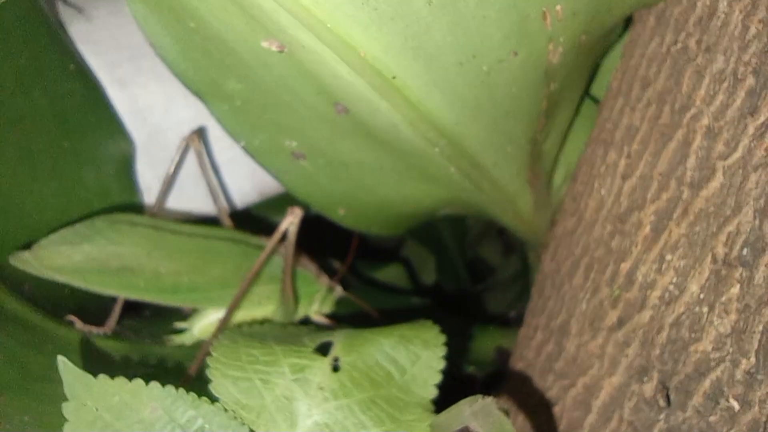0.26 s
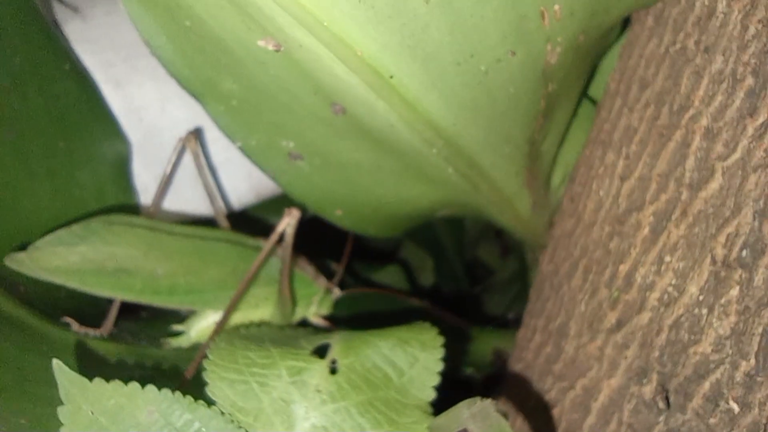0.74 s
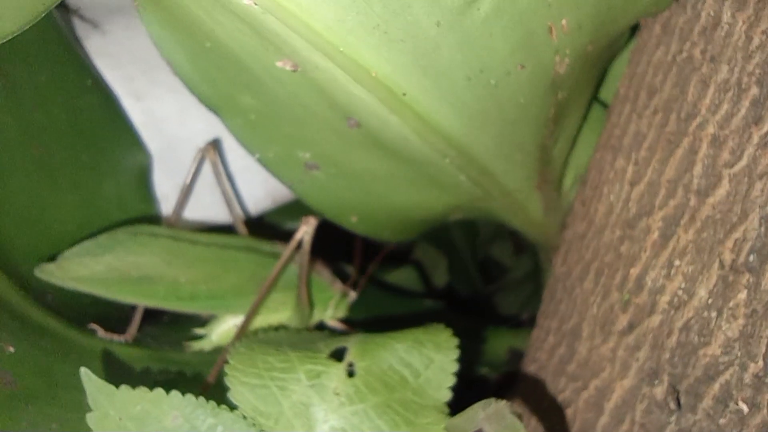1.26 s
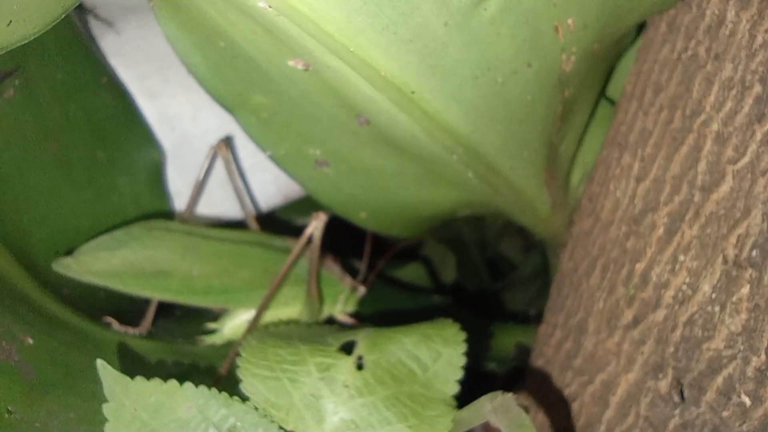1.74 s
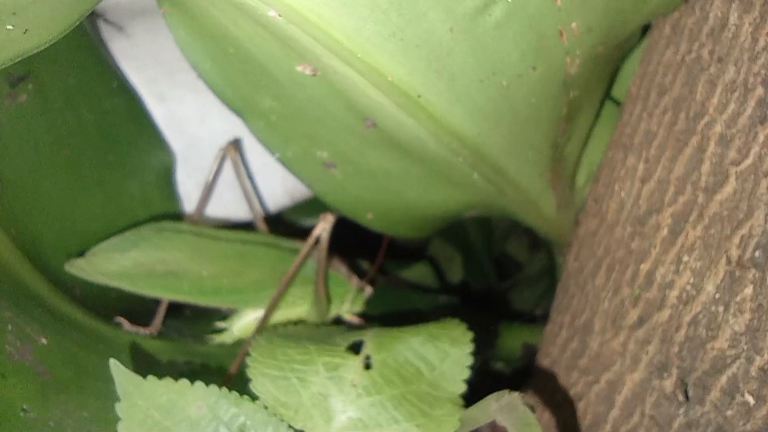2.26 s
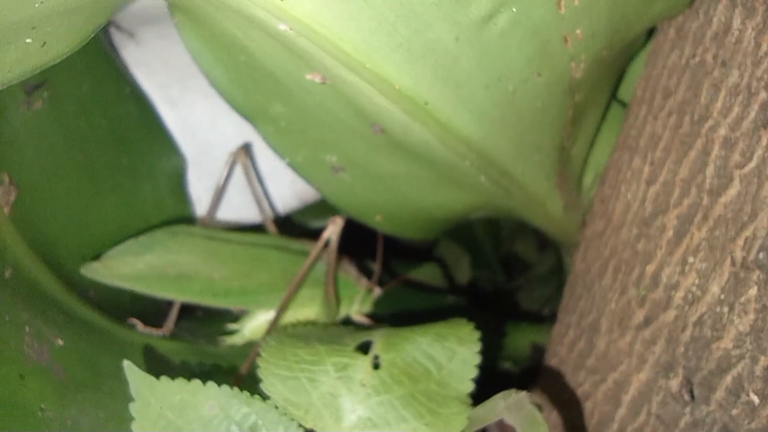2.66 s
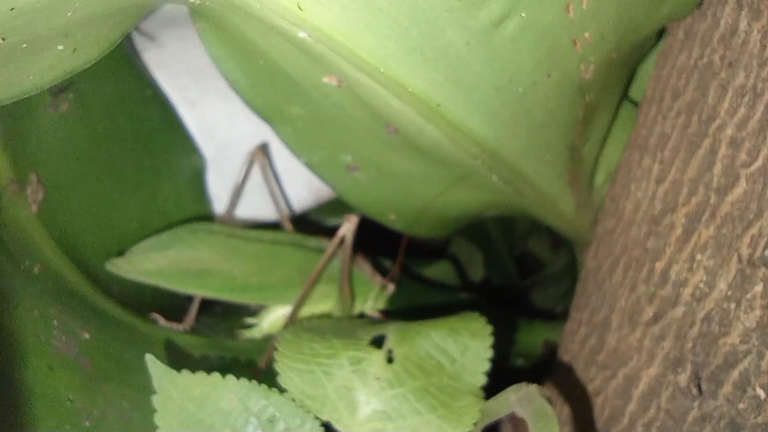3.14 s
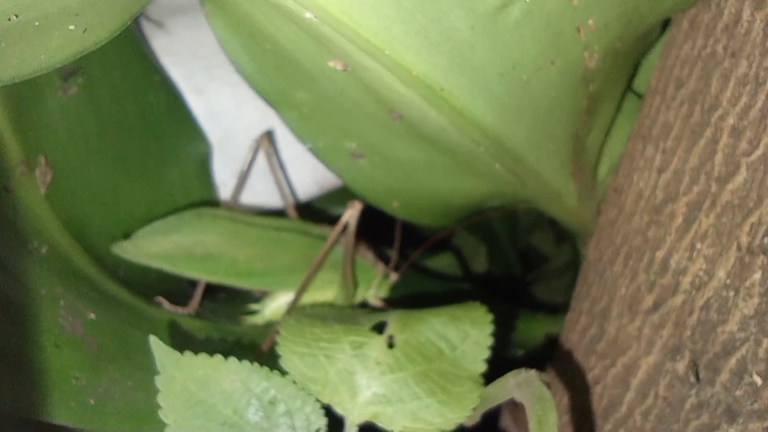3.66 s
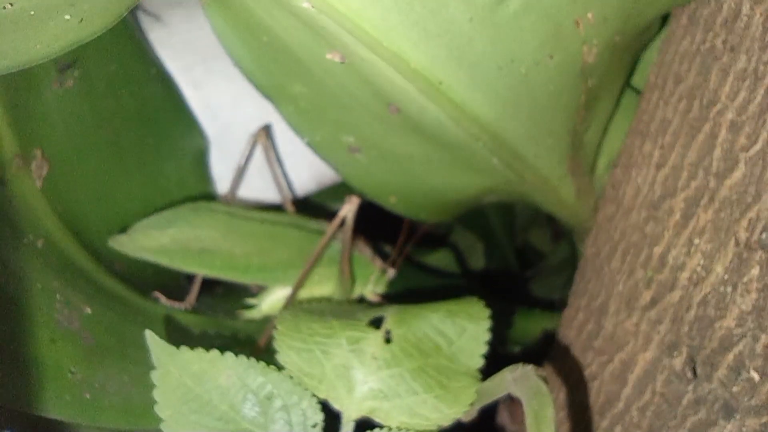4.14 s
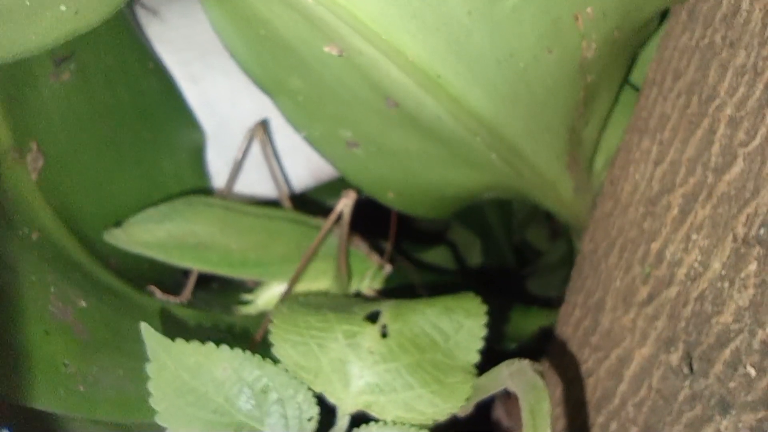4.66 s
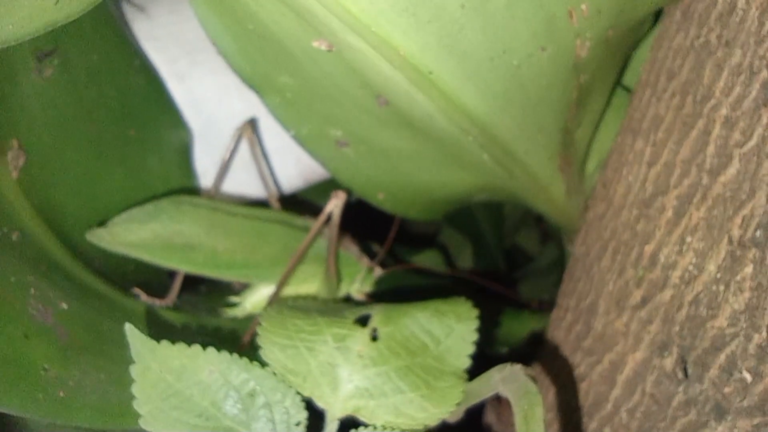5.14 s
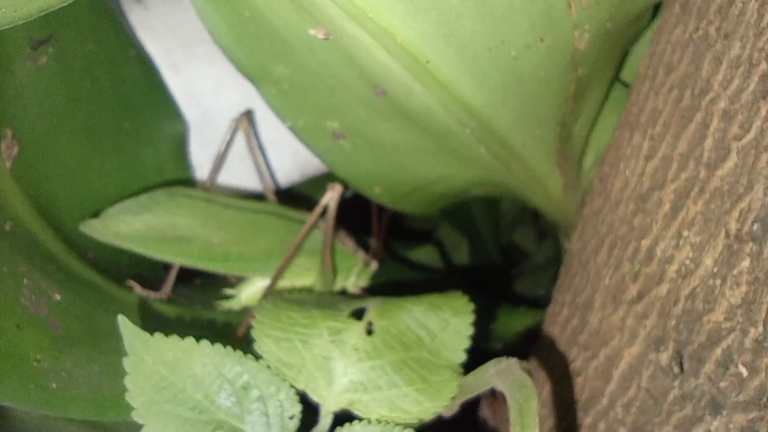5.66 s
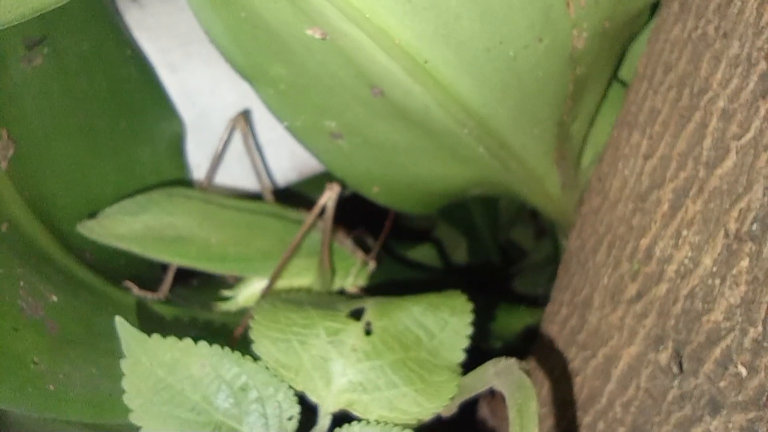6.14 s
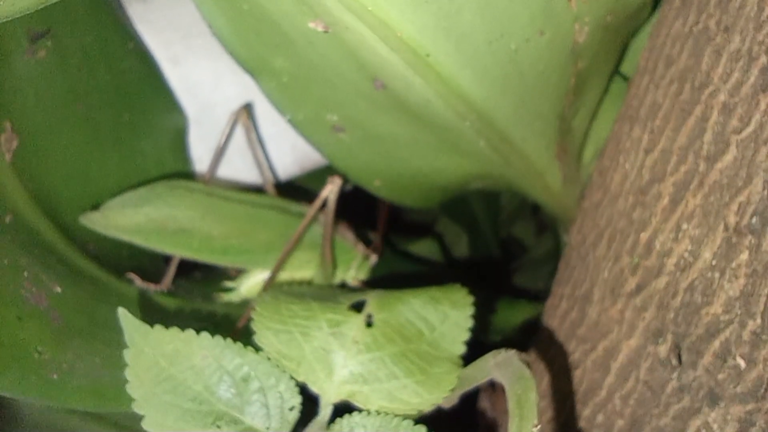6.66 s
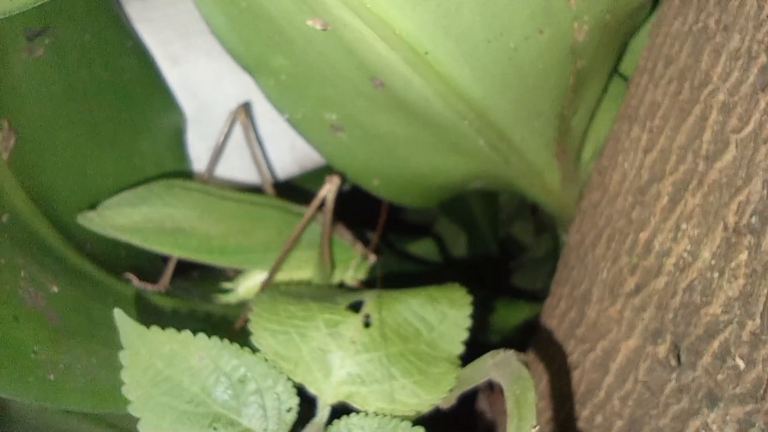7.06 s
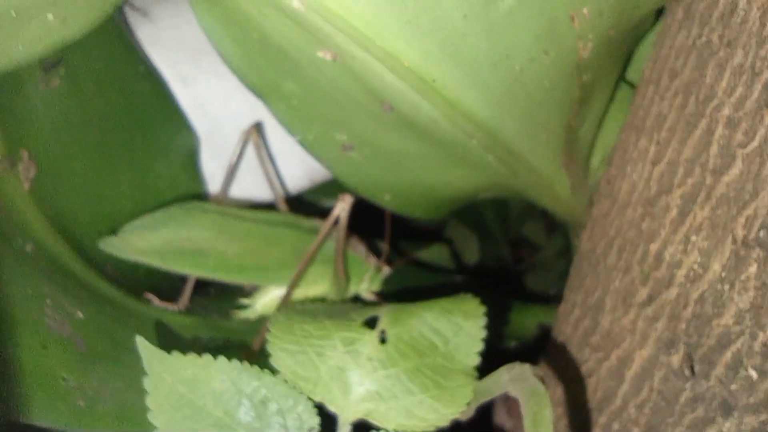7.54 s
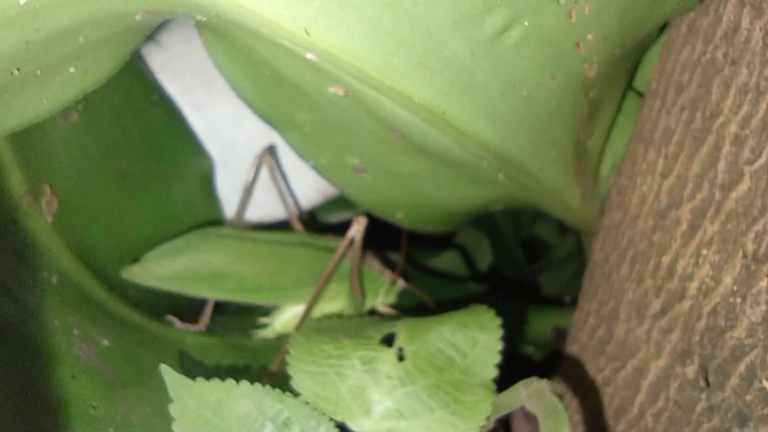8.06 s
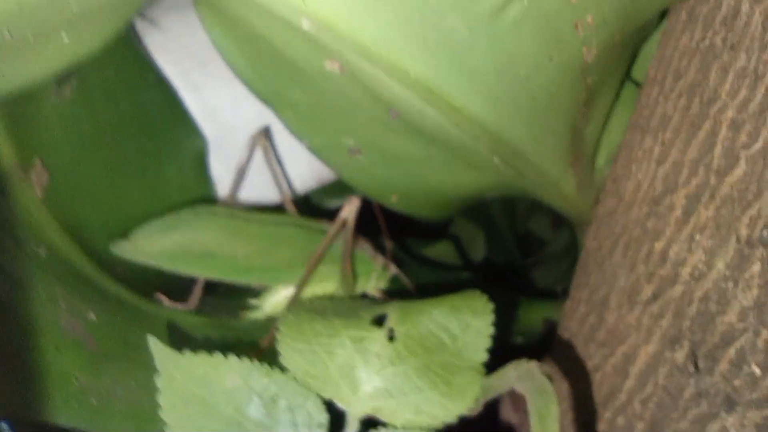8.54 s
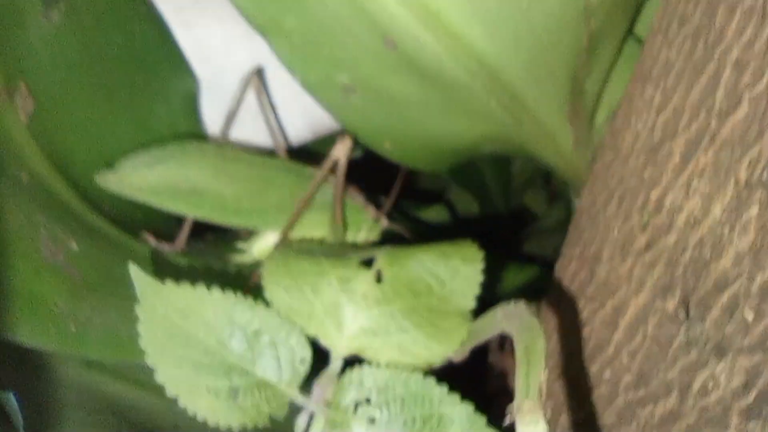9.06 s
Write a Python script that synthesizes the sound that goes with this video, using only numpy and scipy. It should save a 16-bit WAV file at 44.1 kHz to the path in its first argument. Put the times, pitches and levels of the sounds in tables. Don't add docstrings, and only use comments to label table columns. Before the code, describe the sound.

From 0 to about 9.3 seconds a single katydid buzzes without a break, very close to a stereo microphone among leaves at night. The rasp pulses about 23 times a second, slowing slightly to about 22, with small irregular hurries. Each stroke packs several short pitched bursts around 6 to 8 kHz over gritty scraping, with fainter ringing near 9 to 11 kHz. The main song leans left at first and drifts toward the right over the first several seconds; it grows somewhat fuller, and its high overtones ring clearer from about 3 seconds and again after 8. Throughout, overload adds a low fluttering crackle with soft thumps and rumble, clearly stronger on the left. At about 5.9 to 6.6 seconds a far animal gives one faint, hoarse, rising cry. The buzz continues to the end with a slightly thinned, compressed texture.

```python
import sys
import numpy as np
from scipy import signal
from scipy.fft import rfft, irfft, next_fast_len
from scipy.io import wavfile
from scipy.ndimage import uniform_filter1d, map_coordinates

SR = 44100
rng = np.random.default_rng(int(sys.argv[2]) if len(sys.argv) > 2 else 0)


def int16_out(signal):
    q = np.round(np.clip(np.atleast_2d(signal).T, -1, 1) * 32767)
    wavfile.write(sys.argv[1], SR, q.astype(np.int16))


def rack_gain(trim_db):
    fader = np.asarray(trim_db, float)
    return 10 ** (fader / 20)


N = 410130


def unit(x):
    return x / np.sqrt(np.mean(x ** 2, axis=-1, keepdims=True) + 1e-20)


def columns(rows, at):
    first, *cols = np.transpose(rows)
    return np.array([np.interp(at, first, c) for c in cols])


def filtered(x, response):
    m = next_fast_len(N + SR // 4)
    return irfft(rfft(x, m) * response(np.fft.rfftfreq(m, 1 / SR)), m)[..., :N]


def coloured(x, spectrum):
    f, *sides = np.transpose(spectrum)

    def response(hz):
        return rack_gain(np.array([np.interp(np.log(hz + 1), np.log(f), s) for s in sides]))
    return filtered(x, response)


def wobble(rate, channels=2):
    knots = rng.standard_normal((channels, int(N * rate / SR) + 4))
    places = np.arange(N) * rate / SR
    return np.array([map_coordinates(k, [places], order=1) for k in knots])


def hump(strokes, centre, width):
    return np.exp(-(((strokes - centre + .5) % 1 - .5) / width) ** 2)


def panned(level_db, pan_db):
    ratio = rack_gain(pan_db)
    return 2 * rack_gain(level_db) * np.array([ratio, np.ones(N)]) / np.sqrt(1 + ratio ** 2)


# time in seconds, lead in strokes.
HURRIES = [(0, .045), (1.5, -.05), (1.95, .03), (2.55, -.04), (3.1, .02), (3.5, -.025), (4.2, .01),
           (4.85, -.055), (5.4, .02), (6.1, .04), (6.45, -.025), (7.75, .065), (8.25, -.04), (8.55, .015),
           (9.0, -.09), (9.3, .02)]


def wing_strokes():
    t = np.arange(N) / SR
    start_hz, slowing_hz_per_s = 23.384, .13955
    return .588 + (start_hz - slowing_hz_per_s * t / 2) * t + columns(HURRIES, t)[0]


# time in seconds, level in dB, clearness of the overtones in dB.
SONG_LEVELS = [(0, -25, 4.5), (.9, -23.5, -2), (1.7, -22, 1), (2.8, -21.5, 4.5), (3.45, -20.5, 10.5),
               (4.5, -20.5, 8), (5.2, -21, 5.5), (6.9, -21.5, 5.5), (7.9, -20.5, 9.5), (8.5, -19.5, 10),
               (9.0, -21.5, 8.5), (9.3, -20, 11)]


def song(strokes):
    t = np.arange(N) / SR
    level_db, clear_db = columns(SONG_LEVELS, t)
    high_db = -7 - 1.74 * (level_db - level_db.mean()) - .31 * clear_db
    pan_start_db, pan_end_db, swing_s = 5.5, -4, 2.8
    pan_db = pan_end_db + (pan_start_db - pan_end_db) * np.exp(-t / swing_s)
    high_pan_db = -2.5 + .4 * clear_db

    def below(f):
        return 1 / (1 + (f / 8250) ** 24)
    noise = rasp(strokes)
    low = unit(filtered(noise, below))
    high = unit(filtered(noise, lambda f: 1 - below(f)))
    low = rack_gain([[-3.5], [-4]]) * low + rack_gain([[-4], [-4.5]]) * main_runs(strokes)
    high = rack_gain([[-5], [-5.5]]) * high + rack_gain([[-7.5], [-9]] + clear_db) * overtone_runs(strokes)
    wings = panned(level_db, pan_db) * low + panned(level_db + high_db, high_pan_db) * high
    return leaf_echo(wings) + hiss(strokes, level_db)


# centre in strokes, length in strokes, tooth rate in Hz,
# glide in Hz, left level in dB, right level in dB.
MAIN_RUNS = [
    (.06, .14, 5950, -250, -6, -16),
    (.21, .13, 6750, 200, -4, -5),
    (.32, .14, 6050, 300, -4, -15),
    (.43, .12, 6700, 100, -8, -6),
    (.56, .22, 7300, 100, -6, 0),
    (.64, .24, 7780, 50, -12, -5),
    (.67, .11, 5650, 100, -5, -8),
    (.71, .09, 6200, 600, -6, -9),
    (.80, .21, 6800, 90, 0, -1),
    (.93, .09, 6100, -300, -9, -14),
]


def main_runs(strokes):
    return tooth_runs(MAIN_RUNS, strokes, scatter_db=0.3, own_db=1.5, slip=0.0148, rough=0.00812)


# centre in strokes, length in strokes, pitch in Hz,
# glide in Hz, left level in dB, right level in dB.
OVERTONE_RUNS = [(.07, .16, 10130, -50, 0, -3), (.30, .14, 10100, 100, -3, -6),
                 (.52, .16, 10050, 150, -3, -6), (.35, .12, 8750, 200, -5, -4), (.61, .08, 8800, 0, -5, -4),
                 (.68, .14, 11100, -250, 1, -1), (.97, .1, 9900, 300, -5, -9)]


def overtone_runs(strokes):
    return tooth_runs(OVERTONE_RUNS, strokes, scatter_db=0.0, own_db=2.5, slip=0.017, rough=0.00545)


def tooth_runs(runs, strokes, scatter_db, own_db, slip, rough):
    out, count = np.zeros((2, N)), int(strokes[-1]) + 2
    for centre, length, hz, glide, left_db, right_db in runs:
        whole = np.floor(strokes - centre + .5).astype(int) + 1
        late, sharp, big, near, far = rng.standard_normal((count + 1, 5))[whole].T
        u = (strokes - whole + 1 - centre - slip * late) / length
        uneven = 1 + .004 * sharp + rough * wobble(600, channels=1)[0]
        pitch = hz * uneven + glide * np.clip(u, -1, 1)
        turn = 2 * np.pi * np.cumsum(pitch) / SR
        swell = np.cos(np.pi * np.clip(u / 0.92, -.5, .5)) ** 2 * rack_gain(scatter_db * big)
        out[0] += swell * rack_gain(left_db + own_db * near) * np.sin(turn + left_lead(hz))
        out[1] += swell * rack_gain(right_db + own_db * far) * np.sin(turn)
    return unit(out)


# frequency in Hz, left lead in radians.
MICROPHONE_LEAD = [(5900, 2.1), (6800, .9), (7400, 2.4), (8800, 2.7), (10100, 3.2), (11100, 1.6),
                   (12500, 2.6)]


def left_lead(hz):
    return columns(MICROPHONE_LEAD, hz)[0]


# frequency in Hz, width in Hz, level in dB.
LEFT_RESONANCES = [(5680, 760, -5), (6640, 470, -2.5), (7100, 170, 0), (7600, 1500, -4), (9150, 1100, -1),
                   (10900, 600, 4.5), (10300, 850, -4), (12300, 1000, -31)]
RIGHT_RESONANCES = [(5550, 180, -4.5), (6650, 480, 5.5), (6677, 115, 8), (7400, 350, 6), (7690, 970, 4),
                    (8220, 520, 3), (9700, 680, -4.5), (10400, 530, -46)]


def rasp(strokes):
    reopening_db = -hump(strokes, .93, .15)
    push = rack_gain(reopening_db + 4.5 * wobble(150, channels=3))
    shared, *own = push * rng.standard_normal((3, N))
    shared = [filtered(shared, lambda f: np.exp(1j * left_lead(f))), shared]
    alike = 0.43
    teeth = np.sqrt(alike) * np.array(shared) + np.sqrt(1 - alike) * np.array(own)

    def ring(f, modes):
        total = 0
        for k, (c, w, db) in enumerate(modes):
            total = total + (-1) ** k * rack_gain(db) * 1j * f * w / (c * c - f * f + 1j * f * w)
        return total

    def body(f):
        sides = np.abs([ring(f, LEFT_RESONANCES), ring(f, RIGHT_RESONANCES)])
        return sides / (1 + (5300 / (f + 1)) ** 16)
    return filtered(teeth, body)


# delay in
# seconds, level in dB.
LEAF_ECHOES = [(.00372, -14), (.003125, -8)]


def leaf_echo(wings):
    def response(f):
        return np.array([1 - rack_gain(db) * np.exp(-2j * np.pi * f * s) for s, db in LEAF_ECHOES])
    return filtered(wings, response)


# frequency in Hz, left and right levels in dB per Hz.
HISS_COLOUR = [(1340, -12.5, -16.5), (2510, -7.5, -10), (4120, -4, -4), (5300, -1.5, -5),
               (8060, -2.5, -4.5), (11400, -2.5, -4.5), (15300, -7.5, -12.5), (15900, -12, -19)]


def hiss(strokes, level_db):
    swell_db = 0.65 * (level_db + 22.5) - 1.8 * hump(strokes, .93, .15)
    return rack_gain(-14 + swell_db) * coloured(rng.standard_normal((2, N)), HISS_COLOUR)


# time in seconds, level in dB.
FLUTTER_LEVELS = [(0.0, -29), (0.39, -24), (0.57, -28), (0.6, -25.5), (3.37, -28.5), (4.04, -27),
                  (4.87, -28), (7.33, -26), (7.46, -28), (8.26, -27.5), (9.2, -29), (9.3, -28)]


def flutter(strokes):
    whole = strokes.astype(int)
    strokes = strokes - np.array([[0], [.028]])
    level_db = columns(FLUTTER_LEVELS, np.arange(N) / SR)[0] - 3.5
    pan_db = 11 + 2 * (level_db - level_db.mean())
    mix = rack_gain(1.57) * crackle(strokes, whole) + rack_gain([[-11], [-17]]) * jolts(strokes)
    mix = mix + rack_gain([[-7], [-7.5]]) * rumble()
    return rack_gain(3.0) * panned(level_db, pan_db) * mix


# centre in strokes, width in strokes, thump in dB, crackle in dB.
SCRAPER_PUSHES = [
    (.09, 0.18, -7, -8),
    (.41, 0.18, 0.5, -0.6),
    (.70, 0.13, -3, -4),
]
# frequency in Hz, left and right levels in dB per Hz.
CRACKLE_COLOUR = [(30, -43, -55), (60, -9, -19), (113, 0.5, 3.5), (343, -3.5, 0), (1200, -14.5, -7),
                  (2670, -17, -2), (4320, -16, -9.5), (8900, -49, -26)]


def crackle(strokes, whole):
    thump = sharp = rack_gain(-16)
    for centre, width, thump_db, sharp_db in SCRAPER_PUSHES:
        thump = thump + rack_gain(thump_db) * hump(strokes, centre, width)
        sharp = sharp + rack_gain(sharp_db) * hump(strokes, centre, 0.67 * width)
    effort = rng.standard_normal((whole[-1] + 1, 2))[whole].T
    early, longer = .042 * rng.standard_normal((whole[-1] + 1, 2))[whole].T
    closing = 1 / (1 + ((strokes % 1 - .576 + early) / (.27 + longer / 2)) ** 20)
    grain_db = 0.5 * effort + 2.74 * wobble(350) - 9.5 * (1 - closing)
    grains = rack_gain(grain_db) * rng.standard_normal((2, N))

    def below(f):
        return 1 / (1 + (f / 550) ** 2)
    burst = filtered(thump * grains, below)
    burst = burst + filtered(rack_gain(-0.46) * sharp * grains, lambda f: 1 - below(f))
    return unit(coloured(burst, CRACKLE_COLOUR))


STROKE_JOLTS = [
    (0.388, 0.92),
    (0.592, 0.9),
    (.77, 0.79),
]


def jolts(strokes):
    bumps = sum(size * hump(strokes, centre, 0.036) for centre, size in STROKE_JOLTS)
    return unit(filtered(bumps, lambda f: 1 / (1 + 45 / (1j * f + 1e-3)) ** 4))


# frequency in Hz, left and right levels in dB per Hz.
RUMBLE_COLOUR = [(28, -60, -55), (44.4, -12, -10), (90, -5, 10), (366, -15, 13), (734, -56, 0),
                 (1330, -20.5, -20), (3000, -16, -17), (6000, -23, -47)]


def rumble():
    return unit(coloured(rng.standard_normal((2, N)), RUMBLE_COLOUR))


# time in seconds, pitch in Hz.
CRY_PITCH = [(5.9, 530), (6.05, 615), (6.12, 675), (6.22, 695), (6.33, 680), (6.42, 745), (6.56, 750)]


def cry():
    t = np.arange(N) / SR
    pitch, hoarse = columns(CRY_PITCH, t)[0], wobble(60)
    turn = 2 * np.pi * np.cumsum(pitch * (1 + .01 * hoarse[0])) / SR
    fade_s, throat_hz, throat_width_hz = .06, 1280, 40
    shape = np.clip(np.minimum(t - CRY_PITCH[0][0], CRY_PITCH[-1][0] - t) / fade_s, 0, 1)
    second = rack_gain(4) / (1 + ((2 * pitch - throat_hz) / throat_width_hz) ** 2)
    return rack_gain(-39.5) * shape * (rack_gain(3 * hoarse[1]) * np.sin(turn) + second * np.sin(2 * turn))


# frequency in Hz, threshold in dB.
SURVIVAL = [(1500, -30), (2600, -2.2), (4800, -.6), (5400, -4), (6000, -16), (7800, -12), (8500, -3),
            (15500, -.4)]


def thinned(x):
    middle_side = np.array([x[0] + x[1], x[0] - x[1]]) / 2
    hz, t, z = signal.stft(middle_side, SR, window="cosine", nperseg=2048, noverlap=1024)
    band = np.minimum(np.arange(len(hz)) // 5 * 5 + 2, len(hz) - 1)
    pair = np.minimum(np.arange(len(t)) // 2 * 2 + 1, len(t) - 1)
    power = uniform_filter1d(uniform_filter1d(np.abs(z) ** 2, size=5, axis=1), size=2, axis=2)
    power = power[:, band][..., pair]
    busy = uniform_filter1d(power.sum(axis=(0, 1)), size=30)
    around = uniform_filter1d(power, size=40, axis=1) * (busy / busy.mean()) ** .4
    top_hz = 15270 + 200 * np.repeat(rng.standard_normal(len(t)), repeats=2)[:len(t)]
    strong = power > around * rack_gain(2 * columns(SURVIVAL, hz)[0])[:, None]
    keep = strong & (hz[:, None] < top_hz)
    mid, side = signal.istft(z * keep, SR, window="cosine", nperseg=2048, noverlap=1024)[1][:, :N]
    return np.array([mid + side, mid - side])


def scene():
    strokes = wing_strokes()
    return song(strokes) + flutter(strokes) + cry()


def band_limit(x):
    return signal.sosfilt(signal.butter(12, 15750, fs=SR, output="sos"), x)


def record(dry):
    x = dry / (1 + np.abs(dry / 1.02) ** 8) ** (1 / 8)
    mix = thinned(x)
    return band_limit(mix)


dry = scene()
out = record(dry)
int16_out(out)
```